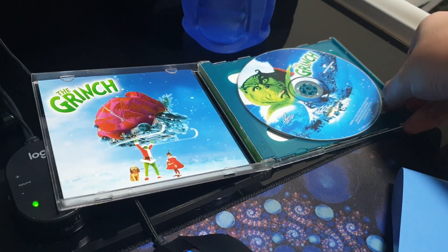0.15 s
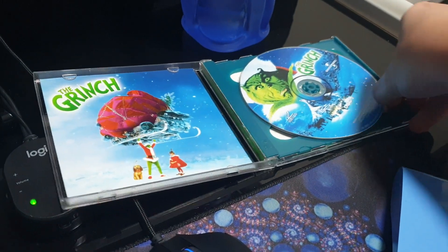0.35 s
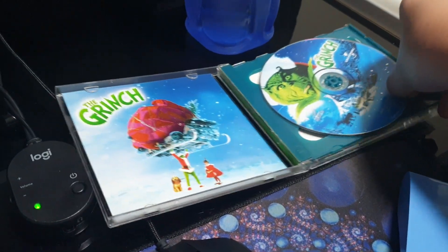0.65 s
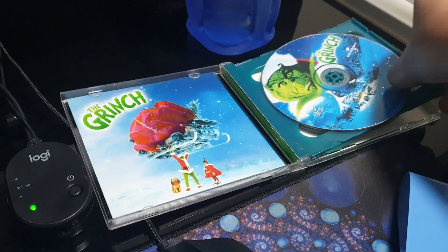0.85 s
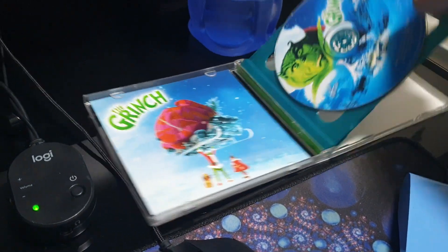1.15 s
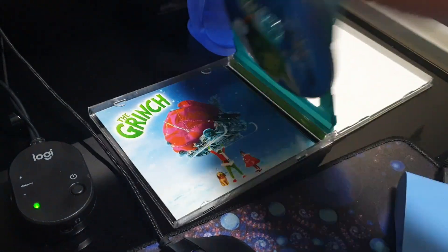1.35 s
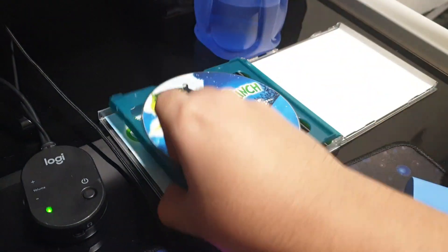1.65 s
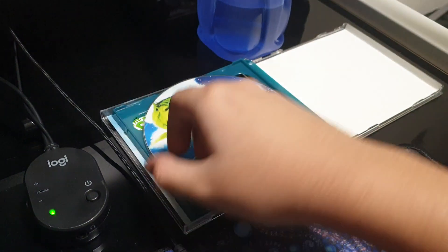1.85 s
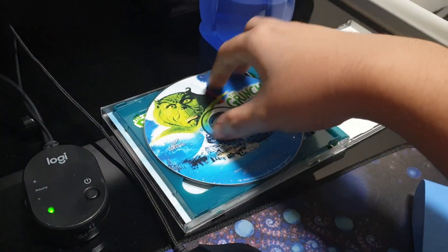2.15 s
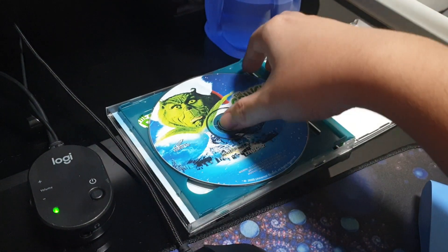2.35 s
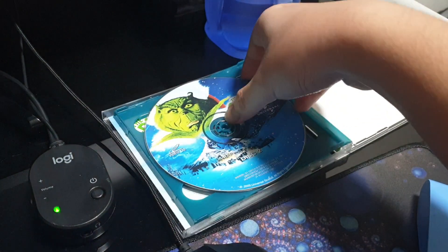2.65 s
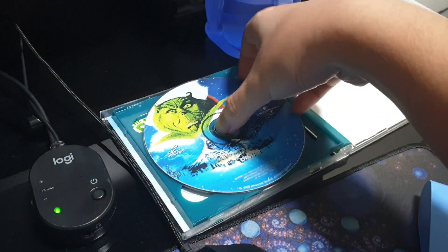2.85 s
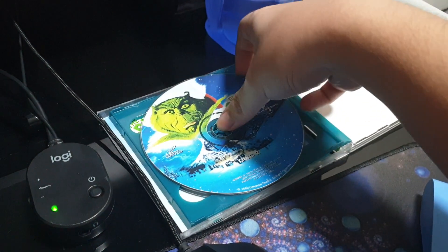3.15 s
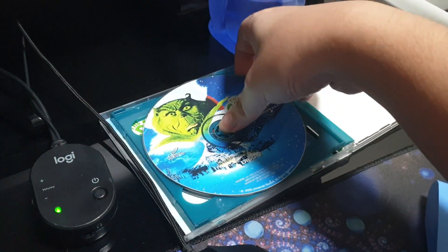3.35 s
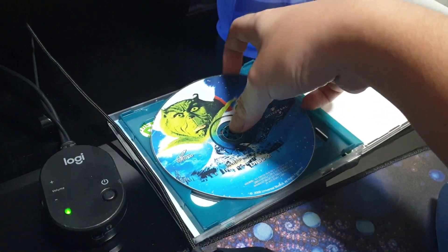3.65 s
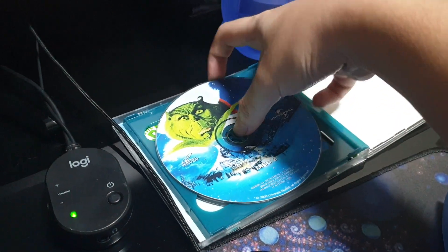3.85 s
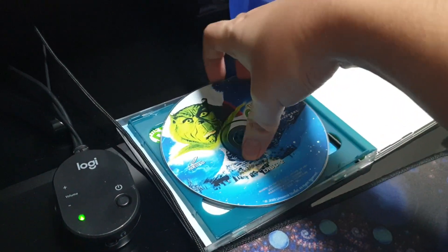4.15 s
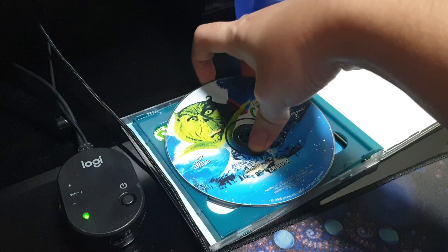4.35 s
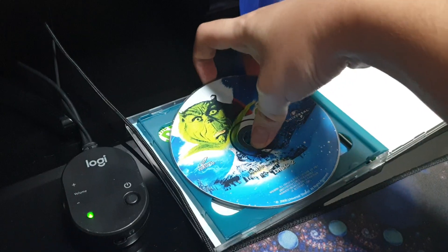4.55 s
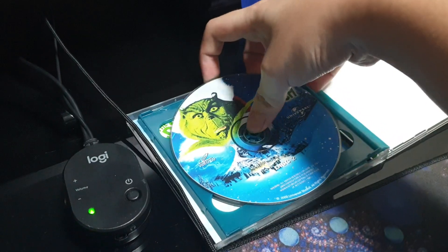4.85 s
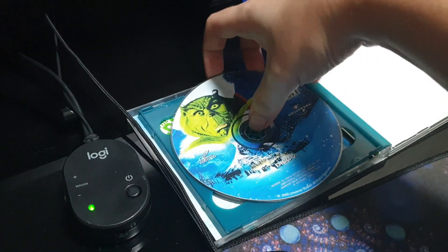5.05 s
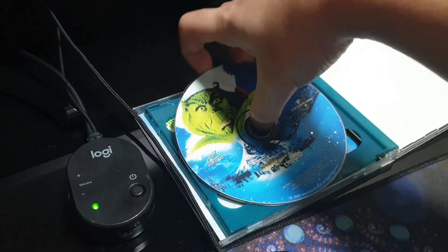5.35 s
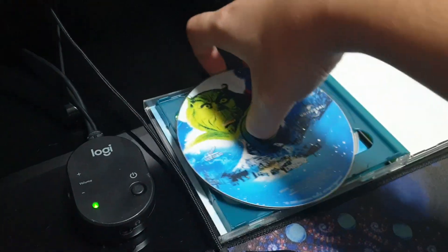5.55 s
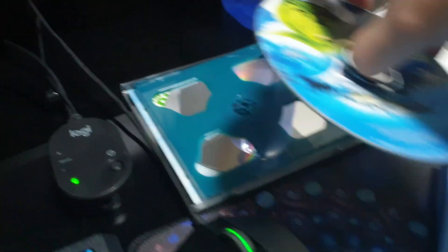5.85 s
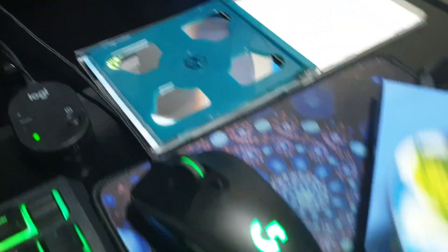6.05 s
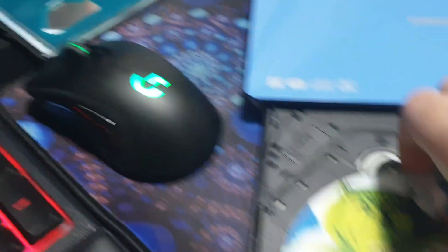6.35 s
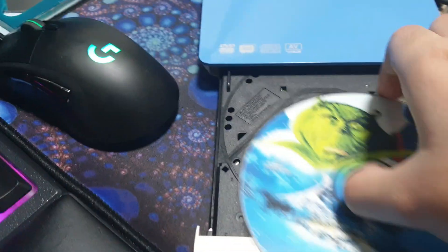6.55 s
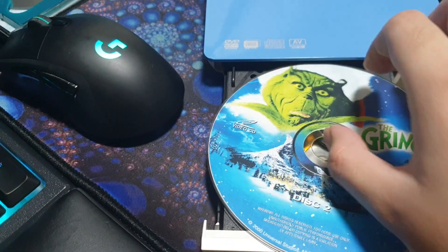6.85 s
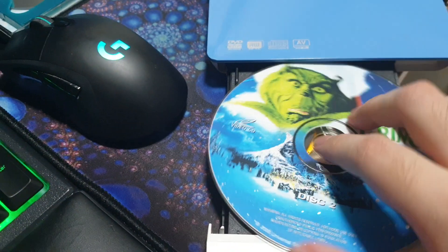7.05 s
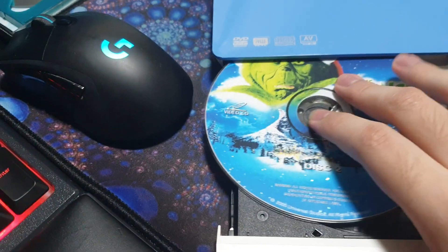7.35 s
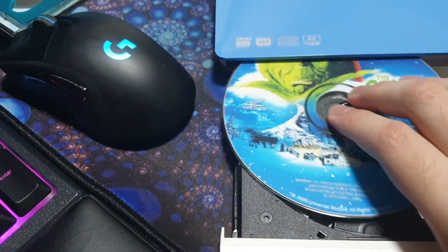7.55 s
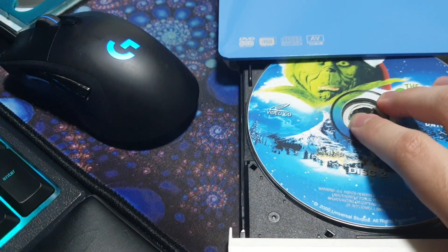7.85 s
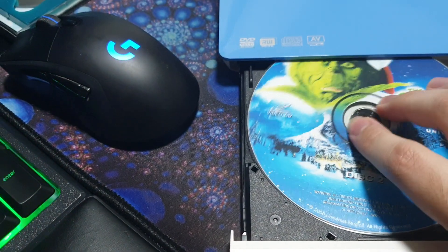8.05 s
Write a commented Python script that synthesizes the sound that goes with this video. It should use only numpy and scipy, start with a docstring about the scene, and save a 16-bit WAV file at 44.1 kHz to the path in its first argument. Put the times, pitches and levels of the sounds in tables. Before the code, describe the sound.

Brittle plastic handling, close and dry with a short room tail. Clusters of case clicks come first, then rubs, ticks and faint fingertip squeaks while a disc is worked off its hub, with dull desk knocks. It springs free with a bright, rattling crack. After a quiet move with light rustling, tray clicks and rim chirps lead to firm closing snaps, while soft fan noise returns.

```python
"""At a desk in a small room, a hand flips the tray of a plastic disc case, works a disc off and presses it into a drive tray.
Clicks, rubs and the snap are bursts of noisy slips ringing plastic resonances, with a short room tail.
Desk thuds and fingertip squeaks are sines; rim chirps and loose crackle are noise through resonances.
Fans, rumble, scraping and rustle are shaped noise. The fans and rumble sink after the big snap and return at the end."""
import sys
import numpy as np
from scipy import signal
from scipy.fft import rfft, irfft, next_fast_len
from scipy.io import wavfile
from scipy.ndimage import uniform_filter1d

SR = 44100
rng = np.random.default_rng(int(sys.argv[2]) if len(sys.argv) > 2 else 0)


def to_wav(sig):
    """Store sig (one row per channel, or 1-D mono) as 16-bit WAV at the path in sys.argv[1].

    Samples outside -1..1 are clipped; the rate is SR.
    """
    pcm = np.clip(np.atleast_2d(sig), -1, 1) * 32767
    pcm = np.round(pcm).astype(np.int16)
    wavfile.write(sys.argv[1], SR, pcm.T)  # frames by channels


N = 361619


def amp(db):
    """Gain of a level in dB."""
    return 10 ** (np.asarray(db) / 20)


def unit(x):
    """x at rms 1."""
    return x / np.sqrt(np.mean(np.abs(x) ** 2) + 1e-20)


def along(points, hz):
    """Read a curve of (Hz, value) points on a log frequency axis."""
    f, v = np.transpose(points)
    return np.interp(np.log(hz + 1), np.log(f + 1), v)


def curves(rows):
    """One value per sample for each column after the time."""
    s, *cols = np.transpose(rows)
    return [np.interp(np.arange(N) / SR, s, c) for c in cols]


def filtered(x, response):
    """x times a complex response of frequency."""
    m = next_fast_len(N + SR // 2)
    return irfft(rfft(x, m) * response(np.fft.rfftfreq(m, 1 / SR)), m)[..., :N]


def resonances(modes, f):
    """Causal response of (Hz, width Hz, dB) resonances, with alternating signs."""
    total = 0
    for k, (centre, width, db) in enumerate(modes):
        bandpass = 1j * f * width / (centre * centre - f * f + 1j * f * width)
        total = total + (-1) ** k * amp(db) * bandpass
    return total


# Left-right likeness of the stereo image. Each row: frequency in Hz, correlation from -1 to 1.
STEREO_LIKENESS = [(40, 0.78), (200, 1), (600, .7), (1500, 0.19), (5000, -0.05), (14000, -0.094)]


def pair(spectra, f):
    """Left and right from two unrelated spectra: alike in the bass, unlike in the treble."""
    turn = np.arccos(np.clip(along(STEREO_LIKENESS, f), -1, 1)) / 2
    mid, side = spectra[0] * np.cos(turn), spectra[1] * np.sin(turn)
    return np.array([mid + side, mid - side])


def rush(gain, patchy_db):
    """Stereo noise of rms 1, coloured by gain, with random patches in time and frequency."""
    z = signal.stft(rng.standard_normal((2, N)), nperseg=512)[2]
    field = uniform_filter1d(rng.standard_normal(z.shape[1:]), size=6, axis=0)
    field = uniform_filter1d(field, size=10, axis=1)
    noise = signal.istft(z * amp(patchy_db * unit(field)), nperseg=512)[1][:, :N]
    m = next_fast_len(N)
    f = np.fft.rfftfreq(m, 1 / SR)
    return unit(irfft(pair(rfft(noise, m), f) * gain(f), m)[:, :N])


# Slow moves of the bed. Each row: time in seconds, fan level in dB, rumble level in dB.
BED_LEVELS = [(0, -52, -60), (1.2, -47, -58.5), (2.1, -46.5, -53.5), (3.0, -47, -58), (3.7, -47, -59.5),
              (4.75, -46, -52), (5.3, -47, -54.5), (5.6, -55.5, -68), (6.2, -55.5, -69), (7.3, -56.5, -71),
              (8.2, -48, -60)]
# Colour of the fan air. Each row: frequency in Hz, relative level per Hz in dB.
FAN_AIR = [(53, -37), (90, -15), (118, 5), (151, -7), (325, -5), (532, -17.5), (578, -19), (740, -14.5),
           (926, -19.5), (1010, -20), (1500, -29.5), (1950, -72), (3300, -120)]
# Wavering fan tones. Each row: frequency in Hz, width in Hz, relative level in dB.
FAN_TONES = [(112.5, 5.5, -54), (183, 9, -58.5), (228.4, 11, -53.5), (975, 6.1, -62)]


def fans():
    """Broad fan air, with narrow noise bands for its wavering tones."""
    fans_db, _ = curves(BED_LEVELS)
    air = rush(lambda hz: amp(along(FAN_AIR, hz)), patchy_db=.8)
    tones = rush(lambda hz: np.abs(resonances(FAN_TONES, hz)), patchy_db=.5)
    return amp(fans_db) * (air + amp(-5.0) * tones)


# Colour of the low rumble. Each row: frequency in Hz, relative level per Hz in dB.
RUMBLE_COLOUR = [(20, -33.5), (35, -20.5), (58, 1), (85, -5.5), (110, -34.5), (200, -120)]


def rumble():
    """Noise in the deep bass with its own slow level curve."""
    _, rumble_db = curves(BED_LEVELS)
    return amp(rumble_db) * rush(lambda hz: amp(along(RUMBLE_COLOUR, hz)), patchy_db=1.2)


# Hand and sleeve brushing past. Each row: start in seconds, length in seconds, scrape level in dB, rustle level in dB.
SWISHES = [(.45, 0.79, -63, -66.5), (0.837, 0.67, -53.5, -59), (1.6, 0.43, -74, -68), (2.3, 0.74, -67, -75),
           (3.036, 0.2, -81, -67), (3.447, 0.84, -64, -72), (3.845, .5, -57, -58), (4.476, 0.29, -61, -72),
           (5.15, 0.52, -58.5, -70), (5.673, .14, -66.5, -67), (5.956, 0.4, -65, -67),
           (6.499, 0.33, -65, -67.5), (7.107, .33, -59, -71), (7.645, 0.21, -60, -82), (8.0, .4, -70, -74)]


def swells(column):
    """Summed power of the swishes, each a smooth rise and fall."""
    t = np.arange(N) / SR
    power = 0
    for row in SWISHES:
        progress = np.clip((t - row[0]) / row[1], 0, 1)
        power = power + amp(row[column]) ** 2 * np.sin(np.pi * progress) ** 2
    return power


# Colour of the hiss and scraping. Each row: frequency in Hz, relative level per Hz in dB.
HISS_COLOUR = [(710, -34.5), (1200, -6), (1530, -4), (1750, -4.5), (2040, -10), (2280, -5), (3300, -17.5),
               (4860, -7.5), (6260, -11.5), (8130, -21), (9000, -34), (11700, -57), (19800, -120)]
HISS_DB = -13.5  # steady fan hiss, relative to the fans


def scraping():
    """Steady fan hiss that swells into scraping as the hand moves."""
    fans_db, _ = curves(BED_LEVELS)
    hiss = rush(lambda hz: amp(along(HISS_COLOUR, hz)), patchy_db=.8)
    return hiss * np.sqrt(amp(fans_db + HISS_DB) ** 2 + swells(column=2))


# Colour of the treble sheen and rustle. Each row: frequency in Hz, relative level per Hz in dB.
RUSTLE_COLOUR = [(4410, -41.5), (7500, -1), (8610, -9), (11700, -5.5), (15100, -9), (16100, -26),
                 (16500, -38.5)]
SHEEN_DB = -30.5  # steady top end of the hiss, relative to the fans


def rustle():
    """Bright noise: a faint steady sheen, swelling with skin and sleeve."""
    fans_db, _ = curves(BED_LEVELS)
    sheen = rush(lambda hz: amp(along(RUSTLE_COLOUR, hz)), patchy_db=1.2)
    return sheen * np.sqrt(amp(fans_db + SHEEN_DB) ** 2 + swells(column=3))


def background():
    """The bed: fans and rumble leaning right, under scraping and rustle."""
    low = fans() + rumble()
    return low * amp([[-.9], [.9]]) + scraping() + rustle()


# Thin squeaks of a fingertip on the smooth disc, one list per squeak.
# Each row: time in seconds, pitch in Hz, level in dB.
SQUEAKS = [
    [(1.995, 12600, -65), (2.06, 13100, -74), (2.11, 12000, -72)],
    [(3.1, 7450, -72), (3.15, 7460, -64), (3.42, 7560, -81)],
    [(5.177, 13050, -71), (5.25, 13200, -59.5), (5.28, 12770, -67), (5.312, 13500, -48)],
]


def squeaks():
    """Slightly unsteady sines that fade in and out."""
    out, t = np.zeros(N), np.arange(N) / SR
    for rows in SQUEAKS:
        s, hz, db = np.transpose(rows)
        drift = uniform_filter1d(rng.standard_normal(N), size=150)
        pitch = np.interp(t, s, hz) + 40 * unit(drift)
        fade = np.clip(np.minimum(t - s[0], s[-1] - t) / 0.0076, 0, 1)
        tone = np.sin(2 * np.pi * np.cumsum(pitch) / SR)
        out += np.sqrt(2) * fade * amp(np.interp(t, s, db)) * tone
    return out


# The desk answering a press. Each row: start in seconds, level in dB, pitch in Hz, t60 in seconds.
THUDS = [(1.343, -33.5, 225, 0.047), (3.437, -46, 143, 0.13), (4.134, -30, 181.5, 0.21),
         (4.199, -28, 191, 0.12), (4.482, -32.5, 276, 0.11), (5.316, -26, 190, 0.084),
         (7.995, -37.5, 265, 0.26)]


def thuds():
    """A soft press sets the desk top ringing low: a decaying sine with a rounded onset."""
    out, t = np.zeros(N + SR), np.arange(SR // 2) / SR
    onset = 1 - np.exp(-t / 0.0016)
    for s, db, hz, t60 in THUDS:
        decay = amp(db - 60 * t / max(t60, .02))
        out[round(s * SR):][:len(t)] += decay * onset * np.sin(2 * np.pi * hz * t)
    return out[:N]


# Case panels. Each row: frequency in Hz, width in Hz, level in dB.
CASE_PANELS = [(2024, 780, -3.5), (2620, 270, 2.5), (2944, 470, -1), (4180, 720, 1.5), (5620, 2280, -1),
               (7310, 1100, 0.5)]
# Hollow knock of the case on the desk. Each row: frequency in Hz, width in Hz, level in dB.
HOLLOW_KNOCK = [(200, 68, -5.5), (460, 190, 10.5), (808, 209, 18), (868, 140, 20.5), (1515, 750, 8)]
TICKS_PER_S, TICK_SPREAD_DB, TICK_T60_S = 68, 8, .02
CRACKLE_DB = -2  # over the scrape level


def crackle():
    """Loose plastic: sparse random ticks, each a short chatter, ring the panels while the hand moves."""
    loudness = amp(TICK_SPREAD_DB * rng.exponential(size=N).clip(0, 3))
    ticks = (rng.random(N) < TICKS_PER_S / SR) * loudness
    decay = amp(-60 * np.arange(SR // 20) / SR / TICK_T60_S)
    chatter = signal.fftconvolve(ticks, decay)[:N] * rng.standard_normal((2, N))
    ringing = filtered(chatter, lambda hz: resonances(CASE_PANELS, hz) + amp(-16.5) * resonances(HOLLOW_KNOCK, hz))
    return amp(CRACKLE_DB) * np.sqrt(swells(column=2)) * unit(ringing)


# The disc rim scraping the tray. Each row: start in seconds, length in seconds, level in dB.
CHIRPS = [(6.839, 0.1, -56), (7.12, 0.058, -51.5), (7.457, 0.068, -58.5)]
# Narrow modes of the disc rim. Each row: frequency in Hz, width in Hz, relative level in dB.
RIM_MODES = [(1610, 45, 0), (2200, 80, -1), (2770, 50, -4), (4700, 300, -17), (6900, 200, -15)]


def chirps():
    """A rough scrape excites the narrow modes of the disc rim."""
    t = np.arange(N) / SR
    force = 0
    for s, length, db in CHIRPS:
        fade_in = np.clip((t - s) / 0.0037, 0, 1)
        fade_out = np.clip((s + length - t) / 0.061, 0, 1)
        force = force + amp(db) * fade_in * fade_out
    roughness = amp(2.0 * unit(uniform_filter1d(rng.standard_normal(N), size=150)))
    grit = roughness * rng.standard_normal((2, N))
    return force * unit(filtered(grit, lambda hz: resonances(RIM_MODES, hz)))


# Decay of the small room. Each row: frequency in Hz, t60 in seconds.
ROOM_DECAY = [(200, 0.14), (1000, 0.23), (3000, 0.38), (6000, 0.29), (10000, 0.28), (15000, 0.45)]


def room(count):
    """A fresh stereo reverberation tail: decaying noise, scaled to energy 1 on the left."""
    hz, t, z = signal.stft(rng.standard_normal((2, count)), SR, nperseg=256)
    decay = amp(-60 * t / along(ROOM_DECAY, hz)[:, None])
    tail = signal.istft(z * decay, SR, nperseg=256)[1][:, :count]
    tail = tail * (1 - np.exp(-np.arange(count) / SR / 0.0011))  # echoes build up over the first milliseconds
    return tail / np.linalg.norm(tail[0])


def strike(t, crack_db):
    """A brief crack on top of a chatter that builds up a little later and dies away."""
    crack = amp(crack_db - 60 * t / .011) * (1 - np.exp(-t / .0005))
    chatter = amp(-60 * t / 0.1) * (1 - np.exp(-t / .0015))
    shape = crack + chatter
    return shape / shape.max()


def stroke(t, length):
    """A swell and fade over the length of a rub."""
    return np.sin(np.pi * np.clip(t / length, 0, 1)) ** 0.52


def rattle(t, t60):
    """The freed disc shudders on, dying away evenly."""
    return amp(-60 * t / t60) * (1 - np.exp(-t / .0006))


# Drive tray panels. Each row: frequency in Hz, width in Hz, level in dB.
TRAY_PANELS = [(1820, 150, -6), (2190, 140, -1), (2730, 790, -7), (3920, 570, -2.5), (5260, 2160, -7.5),
               (7260, 1150, -6)]
# Bright hub teeth. Each row: frequency in Hz, width in Hz, level in dB.
HUB_TEETH = [(10600, 4100, 10), (12000, 2500, -17), (12500, 2100, -6.5)]
MOVE_S = 6  # the hand leaves the case for the drive tray
SIZZLE_PER_OCTAVE_DB = 5  # a brighter contact also shakes the hub teeth more


def plastic(events, motion, sizzle_db):
    """Each contact is a chatter of tiny slips that rings the plastic, heard direct and through the room."""
    size = 3 * 2 ** 13
    out = np.zeros((2, N + size))
    f, t = np.fft.rfftfreq(size, 1 / SR), np.arange(size // 4) / SR
    hollow, edges = resonances(HOLLOW_KNOCK, f), resonances(HUB_TEETH, f)
    thin = 1j * f / (1j * f + 700)  # thin panels radiate little bass
    for s, db, hz, knock_db, motion_setting in events:
        lumps = amp(1.54 * unit(uniform_filter1d(rng.standard_normal(len(t)), size=40)))  # slips come in clumps
        shape = motion(t, motion_setting)
        slips = shape * lumps * rng.standard_normal((2, len(t)))

        modes, pan_db = (CASE_PANELS, .4) if s < MOVE_S else (TRAY_PANELS, 1.2)
        # every contact favours other modes
        varied = [(c, w, level + rng.normal(0, 2.5)) for c, w, level in modes]
        panels = thin * resonances(varied, f)
        spot = 1 + resonances([(hz, 900, 1.5)], f)  # the part nearest the finger rings most
        edge_db = sizzle_db + SIZZLE_PER_OCTAVE_DB * np.log2(hz / 4000)
        body = panels * spot + amp(knock_db) * hollow + amp(edge_db) * edges

        echo = rfft(room(count=2 ** 14), size) * np.linalg.norm(shape) * amp(-8)  # fed by the energy of the chatter
        late = np.exp(-2j * np.pi * f * t[np.argmax(shape)])  # the echo follows the strongest moment
        both = pair(rfft(slips, size) + echo * late, f) * body * amp([[pan_db], [-pan_db]])
        start = round(s * SR)
        out[:, start:start + size] += amp(db) * irfft(both, size)
    return out[:, :N]


# Short rubs that swell and fade.
# Each row: start in seconds, drive level in dB, finger-spot resonance in Hz, knock level in dB, length in seconds.
RUBS = [(.742, -22.5, 3430, -22, 0.023), (1.052, -41, 6160, -2.5, 0.02), (1.892, -31, 6270, -24, .045),
        (2.268, -30, 4200, -31, 0.031), (2.555, -30, 4430, -22.5, .035), (3.435, -42.5, 4350, -19, .059),
        (4.474, -38.5, 4100, -7.5, 0.028), (4.945, -42, 4240, -12.5, .063),
        (5.458, -31.5, 2730, -18.5, .024), (7.99, -21, 2120, -13.5, .021), (8.02, -34, 2080, -10.5, 0.041)]


def rubs():
    """Plastic slipping steadily under a short stroke."""
    return plastic(RUBS, stroke, sizzle_db=-25)


# Plastic slipping, knocking or cracking.
# Each row: start in seconds, drive level in dB, finger-spot resonance in Hz, knock level in dB, crack over chatter in dB.
CLICKS = [(.0154, -47, 5040, -6, 6), (.0488, -38.5, 1960, -17, 3), (.192, -43.5, 2050, -5.5, 2),
          (.2673, -31, 2640, -16, 13), (.2927, -24.5, 3650, -24, 14), (.4125, -43, 5000, -20, -0.5),
          (.6355, -40.5, 5200, -25, 10), (.7138, -20.5, 3100, -16.5, -2.5), (.7545, -11.5, 7560, -26, 14),
          (.7831, -19.5, 3500, -20.5, 2), (.8082, -29, 7150, -12.5, 4), (.8684, -35.5, 3300, -1, 7.5),
          (1.0575, -33, 6460, -8.5, 3), (1.1209, -39, 2750, -18, 4), (1.2728, -21.5, 6750, -30, 19),
          (1.2801, -14.5, 3700, -24, 11), (1.3414, -31, 7000, -4.5, 4.5), (1.3808, -35, 2330, -12, -4.5),
          (1.4875, -36.5, 2160, -7, 8), (1.5638, -40, 6500, -28, 8), (1.7554, -28.5, 1700, -18, 3.5),
          (1.7694, -34, 1750, -12.5, -2.5), (1.8517, -33, 3720, -15, -2), (1.8667, -27, 3600, -22, 2),
          (1.8775, -19.5, 6360, -14.5, -2), (1.9259, -17.5, 6000, -21, 22), (1.9413, -29.5, 7440, -14, 6.5),
          (2.0063, -39.5, 6230, -9, 22), (2.1096, -33.5, 4340, -15, -1.5), (2.2209, -45, 5100, -13, -2),
          (2.2328, -24, 4530, -17, 4), (2.3113, -22.5, 6350, -32, 21), (2.3341, -15.5, 6140, -21.5, 13.5),
          (2.5326, -31.5, 3050, -12, 2.5), (2.6584, -26.5, 6460, -15, 6.5), (2.8863, -26.5, 4830, -14, 1),
          (2.9692, -42.5, 2290, 3.5, 5), (3.0906, -38, 6300, -31, 11), (3.251, -37.5, 7050, -24, 11.5),
          (3.4216, -42, 6200, 0, 4), (3.4356, -34, 4370, -5, 3), (3.875, -24.5, 4870, -15.5, 9),
          (3.931, -35.5, 3540, -30, -10), (3.9499, -17, 3460, -7.5, 6), (3.9582, -14, 5500, -36, 1.5),
          (3.974, -25, 6700, -32, 3), (4.076, -41, 4450, -6, 8), (4.0831, -29, 3650, -16, -1.5),
          (4.1345, -31.5, 2840, -5.5, 0.5), (4.1425, -30.5, 4300, -14, 5), (4.1714, -31.5, 2500, -3, 7),
          (4.1974, -29, 5200, -31, 1.5), (4.2627, -39, 5200, -6.5, 5), (4.4842, -40.5, 3940, -15, 7),
          (4.5496, -48.5, 2270, -1, 2), (4.6354, -28, 2170, -15, 9), (4.782, -34.5, 6200, -3.5, 14.5),
          (4.7968, -40, 6300, -8, 10), (4.8544, -31.5, 2830, -15, 7), (4.8888, -36, 2330, -10, 5.5),
          (4.9023, -39.5, 4300, -11.5, 4.5), (4.9487, -35.5, 4450, -3, 6), (5.1138, -49.5, 2500, 5, 4.5),
          (5.1766, -36.5, 2630, -8, 5.5), (5.232, -29, 2940, -28, 10), (5.5049, -39.5, 2690, -12, 5),
          (5.5568, -35, 5960, -30, 16), (5.5827, -38.5, 2620, -21, 5), (5.6426, -46, 1997, -0.5, 12),
          (6.5139, -28.5, 2580, -11, 5.5), (6.6094, -42.5, 1920, -4, 5), (6.635, -42, 1850, -7, -1),
          (7.0852, -40, 2166, -9, 4.5), (7.1206, -48.5, 2350, -6, 2), (7.1777, -38.5, 2170, -17.5, 3),
          (7.1975, -31, 1708, -10.5, 6.5), (7.226, -32, 2060, -10, 3.5), (7.2389, -29.5, 2050, -14.5, 4.5),
          (7.2644, -33, 3800, -12, 5.5), (7.3061, -23, 1970, -17, 5.5), (7.3443, -35, 4260, -15.5, 7.5),
          (7.6445, -32.5, 7430, -16, 4.5), (7.6546, -24.5, 5300, -18, 4), (7.684, -40, 4910, -8.5, 5),
          (7.8223, -34, 1890, -11, -2.5), (7.9795, -33, 2080, -7, -3), (7.9982, -12, 2060, -6.5, 13.5),
          (8.0505, -35, 2100, -14, -2), (8.0945, -21.5, 7000, -18, 21), (8.1125, -21.5, 1930, -12.5, -2),
          (8.1218, -7.5, 1810, -17, 19)]


def clicks():
    """Brittle contacts: a crack and its chatter ring the panels."""
    return plastic(CLICKS, strike, sizzle_db=-22.5)


# The disc springs off the hub.
# Each row: start in seconds, drive level in dB, finger-spot resonance in Hz, knock level in dB, rattle t60 in seconds.
SNAP = [(5.3158, -6.5, 6410, -21.5, .2)]


def snap():
    """The disc lets go of the hub at once and rattles out, with extra sizzle from the teeth."""
    return plastic(SNAP, rattle, sizzle_db=-18.5)


def scene():
    """All sources at the two microphone ports."""
    bed = background() + squeaks() * amp([[.3], [-.3]])
    return bed + thuds() + crackle() + chirps() + rubs() + clicks() + snap()


TOP_HZ = 16000  # band limit


def record(dry):
    """The input rounds off the highest peaks; nothing is kept above the band limit."""
    soft = dry / (1 + np.abs(dry / .9) ** 4) ** (1 / 4)
    return filtered(soft, lambda hz: np.clip((TOP_HZ - hz) / 250, 0, 1) ** 2)


dry = scene()
out = record(dry)
to_wav(out)
```